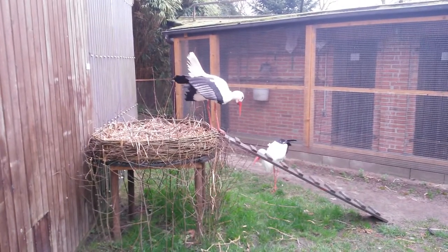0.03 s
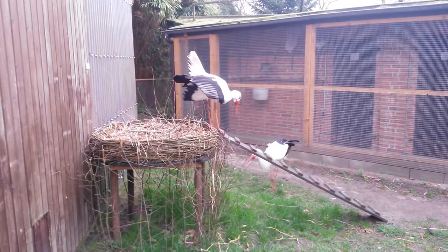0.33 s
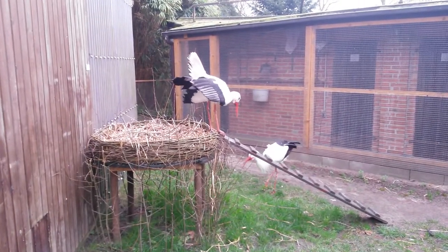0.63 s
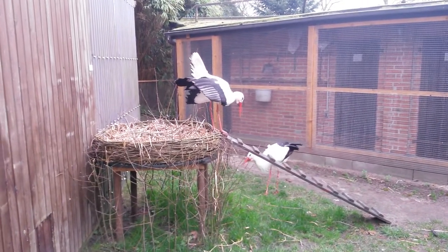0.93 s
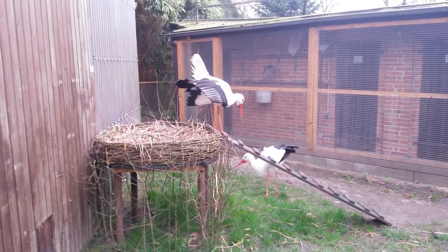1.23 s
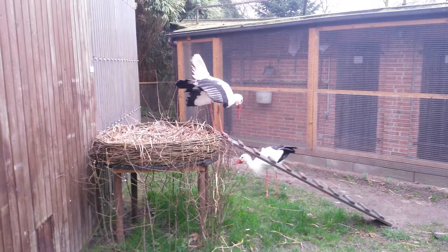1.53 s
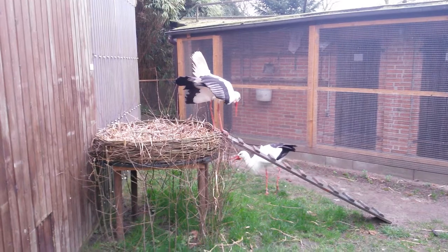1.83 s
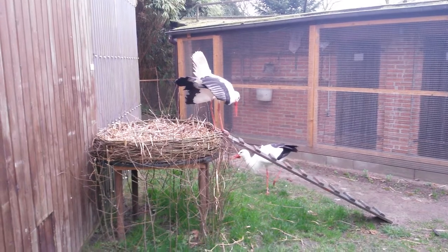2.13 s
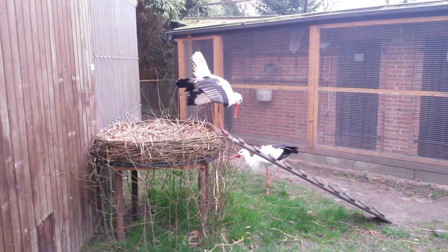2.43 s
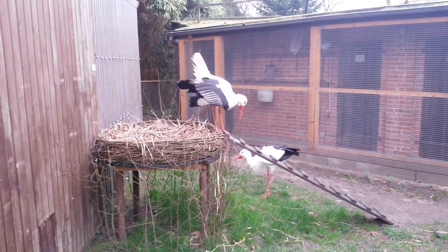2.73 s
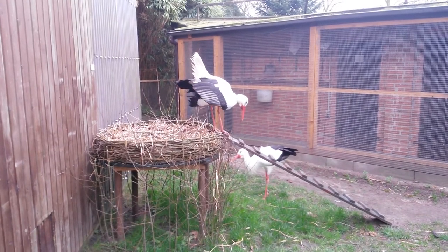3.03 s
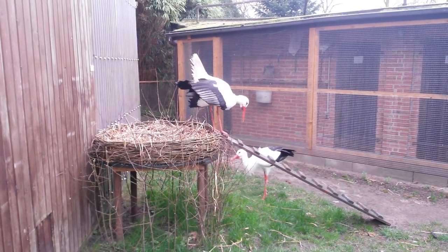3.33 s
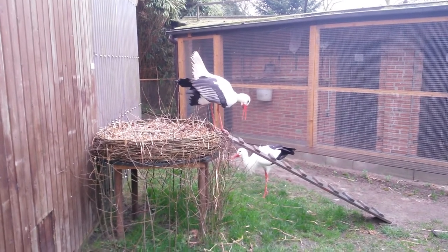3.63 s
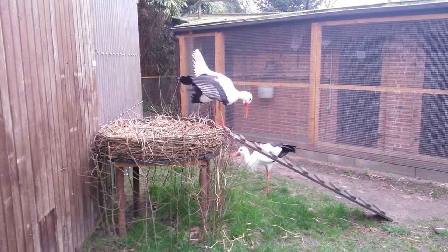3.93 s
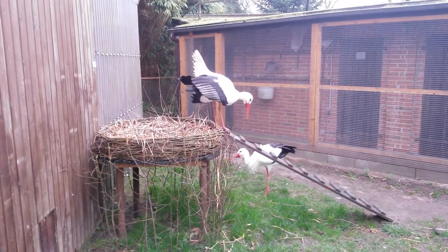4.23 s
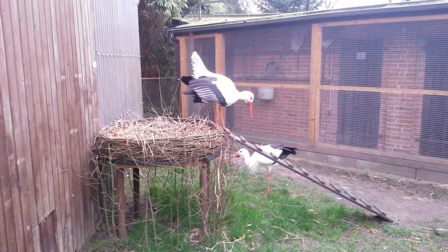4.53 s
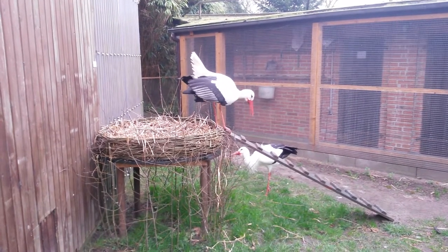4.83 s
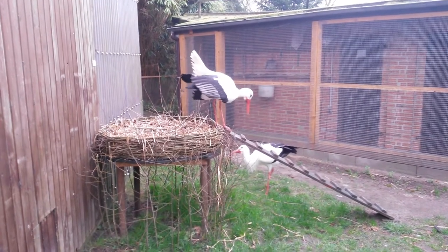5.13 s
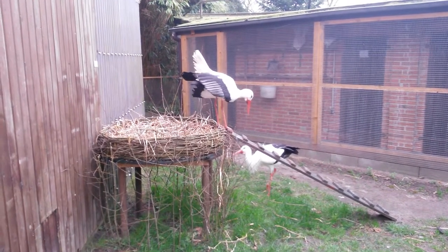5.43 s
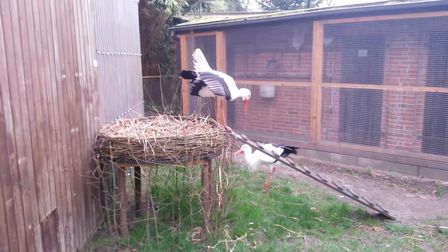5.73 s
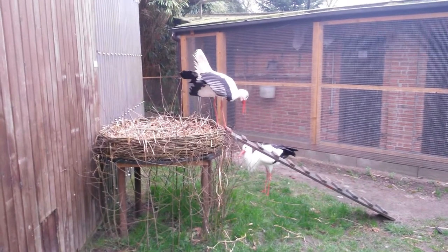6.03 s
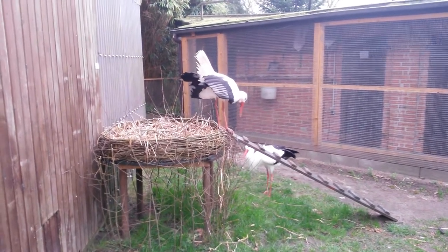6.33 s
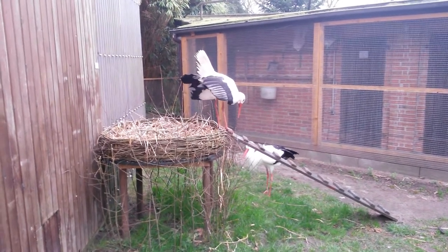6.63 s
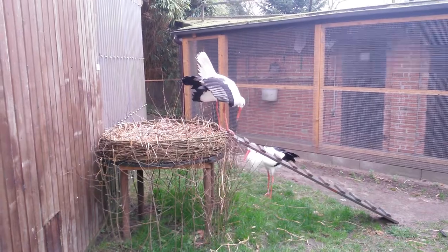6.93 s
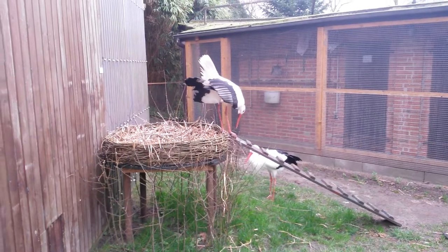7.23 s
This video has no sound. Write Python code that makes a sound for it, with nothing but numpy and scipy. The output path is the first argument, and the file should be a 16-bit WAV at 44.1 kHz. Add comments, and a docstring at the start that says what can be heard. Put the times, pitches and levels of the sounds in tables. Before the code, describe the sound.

From the very start, a stork clatters its bill at about six clacks a second and keeps going for roughly seven seconds. Each clack is a sharp, dry snap with a short hollow ring, thrown back quickly by nearby boards and the walls of an outdoor pen. A second, somewhat softer stork clatters along from the start until about 2.3 seconds, and again from 3.6 to 5.5 seconds. It is slightly faster, so the two drift in and out of step. Near 7 seconds the first stork's clacks turn weaker and duller, dying away by about 7.3. Small birds give faint, thin, high chirps, around 1.3, 3 to 3.5 and 5.4 to 6.2 seconds, and a quiet repeated whistle rises from 6.4 seconds. A low distant rumble, soft hiss and faint hum lie underneath throughout.

```python
"""Storks clattering in a walled pen.

Two white storks clatter their bills, about six clacks a second each, drifting in and out of step.
Each clack is a sharp snap plus the short ring of the hollow bill and throat, thrown back by nearby
boards and the walls behind. Small birds chirp in the trees over a distant rumble and a faint hum."""
import sys
import numpy as np
from scipy import signal
from scipy.fft import rfft, irfft
from scipy.io import wavfile
from scipy.ndimage import uniform_filter1d

SR = 44100
rng = np.random.default_rng(int(sys.argv[2]) if len(sys.argv) > 2 else 0)


def file_out(sig):
    """Save sig as 16-bit WAV at sys.argv[1]."""
    # one column per channel
    cols = np.atleast_2d(sig).T
    # limit, then scale
    lim = np.clip(cols, -1, 1)
    pcm = np.round(lim * 32767).astype(np.int16)
    wavfile.write(sys.argv[1], SR, pcm)


N = 329868
TIME_S = np.arange(N) / SR
CLACK_SAMPLES = 32768
CLACK_HZ = np.arange(CLACK_SAMPLES // 2 + 1) * SR / CLACK_SAMPLES
RADIATION = 1 / (1 + (500 / (CLACK_HZ + 50)) ** 4)  # a small body radiates no bass

# Tempo per bout: (time [s], rate [clacks/s])
PERCH_TEMPO = [(0.06, 5.995), (0.73, 6.082), (1.55, 5.933), (1.73, 6.04), (2.06, 5.764), (2.74, 6.116),
               (3.4, 5.884), (4.25, 5.851), (4.59, 6.042), (5.1, 5.818), (5.61, 5.896), (6.12, 5.894),
               (6.29, 6.086), (6.79, 5.942), (7.11, 6.787)]
GRASS_FIRST_TEMPO = [(0.03, 6.163), (0.67, 6.237), (0.83, 6.405), (1.15, 6.174), (1.47, 6.325), (2.11, 6.2)]
GRASS_SECOND_TEMPO = [(3.56, 6.309), (3.88, 6.347), (4.04, 6.063), (4.36, 6.285), (4.85, 6.179),
                      (5.01, 5.963), (5.34, 6.195)]
# Effort per bout; as the bill goes slack the snap fades first and the ring sinks:
# (time [s], ring gain [dB], snap gain [dB], bill resonance [Hz])
PERCH_EFFORT = [(0.06, -8.5, 1.5, 2040), (1.72, -10, 2, 1990), (2.23, -7.5, 2.5, 2090),
                (2.5, -6, 0.5, 2120), (3.1, -4.5, 5, 2033), (3.75, -6, 1, 1980), (4.75, -5, 1.5, 1936),
                (5.25, -4, 4.5, 2050), (6.12, -6.5, 3, 2030), (6.79, -6, -0.8, 1985),
                (6.95, -11, -9.5, 1850), (7.11, -13, -13, 1760), (7.261, -24.5, -19.5, 1640)]
GRASS_FIRST_EFFORT = [(0.03, -11, -20, 2050), (0.5, -6, -12, 2000), (1.15, -7, -10.5, 2085),
                      (1.55, -4.2, -1, 2090), (2.27, -7.5, -8.5, 2055)]
GRASS_SECOND_EFFORT = [(3.56, -8, -19, 2020), (3.9, -4, -3, 2080), (4.6, -3.5, -0.5, 2047),
                       (5.2, -2, 0.5, 2105), (5.5, -4.5, -4.5, 2130)]


def bout(tempo, effort, start_s, count, ring_spread_db=0.23, snap_spread_db=0.96):
    """A run of clacks, no two alike: one row each, columns as in the effort tables."""
    times = [start_s]
    for _ in range(count - 1):
        times.append(times[-1] + 1 / curve(tempo, times[-1]))
    effort_s, *controls = np.transpose(effort)
    ring_db, snap_db, bill_hz = (np.interp(times, effort_s, control) for control in controls)
    jitter = rng.standard_normal((count, 2)).T
    ring_db += ring_spread_db * jitter[0]
    snap_db += snap_spread_db * jitter[1]
    return np.transpose([times, ring_db, snap_db, bill_hz])


# Head motion: (time [s], echo path shift [ms])
HEAD_MOTION = [(0, 0.064), (1.6, -0.015), (2.4, -0.14), (3.2, 0.1), (4.4, 0.21), (5.2, 0.28), (6.1, 0),
               (6.7, -0.19), (7.4, -0.17)]
# Scattered echoes: (onset [ms], build-up [ms], t60 [s], gain [dB], treble [dB])
BOARD_SCATTER = (.4, 1, .085, -2.5, -1)
WALL_SCATTER = (13, 7, .095, 2, -3)
YARD_SCATTER = (25, 18, 0.23, -9, -2.5)
# Echo strength per position: (nest and boards [dB], walls and yard [dB], wall slap [dB])
PERCH_PLACE = (0, -0.3, 1.8)
GRASS_PLACE = (-3, -5.5, -3)


def stork(clacks, place, throat_db, treble_db, sway=2.5):
    """Mandibles slap shut; snap and ring arrive directly and by echoes that shift with the head."""
    out = np.zeros((2, N))
    near_gain, far_gain, slap_gain = undb(place)
    snap = bill_snap(treble_db)
    boards = scatter(*BOARD_SCATTER, count=200)
    walls = scatter(*WALL_SCATTER, count=500)
    yard = scatter(*YARD_SCATTER, count=4000)
    mic_delay = np.exp(-2j * np.pi * np.outer([0, 2], CLACK_HZ) / SR)  # left is 2 samples nearer
    fade = np.minimum(np.linspace(4, 0, CLACK_SAMPLES), 1)
    for time_s, ring_db, snap_db, bill_hz in clacks:
        throat_jitter, pitch_jitter, head_jitter, *path_jitter = rng.standard_normal(5)
        ring = undb(ring_db) * hollow_ring(bill_hz, throat_db + 0.83 * throat_jitter,
                                           detune=0.0093 * pitch_jitter)
        clack = ring + undb(snap_db) * snap
        head_ms = curve(HEAD_MOTION, time_s) + 0.03 * head_jitter
        shift_ms = sway * head_ms + 0.15 * path_jitter[0]
        near = near_gain * (nest_echoes(head_ms) + boards(shift_ms))
        far = far_gain * (walls(shift_ms) + yard(shift_ms))
        # The ring spreads all round, so the walls return more of it than of the snap.
        slap = slap_gain * ring * wall_slap(shift_ms, path_jitter)
        spectrum = clack * (1 + near + far) + slap
        add(out, time_s, fade * irfft(spectrum * mic_delay))
    return out


# Snap spectrum: (frequency [Hz], relative level [dB])
SNAP_SPECTRUM = [(300, -52.5), (1000, -7), (1400, -25), (1720, -6), (2650, -4), (3650, -0.5), (4800, 3.5),
                 (6300, 3), (7300, -2.5), (8600, -8.5), (10500, -16), (14000, -27), (15000, -79),
                 (16500, -84)]


def bill_snap(treble_db):
    """Spectrum of the bill's horny edges striking."""
    treble = colour([(6500, 0), (10000, treble_db)], CLACK_HZ)
    return minimum_phase(colour(SNAP_SPECTRUM, CLACK_HZ) * treble * RADIATION)


# Hollow bill and throat pouch modes: (frequency [Hz], width [Hz], relative level [dB])
BILL_MODES = [(1980, 305, 2), (3192, 434, -4), (4550, 1200, -14.5)]
THROAT_MODES = [(702, 280, -2.5), (750, 28, -6), (950, 230, -14.5)]


def hollow_ring(bill_hz, throat_db, detune, taut_hz=2056, slack_db_per_hz=0.01):
    """Cavity spectrum; a slack bill's first mode, bill_hz, lies lower and the throat stands out."""
    slack_db = slack_db_per_hz * (taut_hz - bill_hz)
    throat = undb(throat_db + slack_db) * resonances(THROAT_MODES, CLACK_HZ * (1 + detune))
    first_mode = (bill_hz, *BILL_MODES[0][1:])
    bill = resonances([first_mode, *BILL_MODES[1:]], CLACK_HZ)
    return minimum_phase((bill + throat) * RADIATION)


# Nest and board reflections: (delay [ms], left [dB], right [dB], share of head motion [ratio])
NEST_ECHOES = [(1.27, -2, -5, .25), (2.5, -10, -9, .6), (3.6, -4, -8, 1), (4.05, -12, -6, .9)]


def nest_echoes(head_ms):
    """Stereo spectrum of the first reflections off the nest and boards."""
    return sum(echo(ms + share * head_ms, left, right) for ms, left, right, share in NEST_ECHOES)


# House wall reflections: (delay [ms], left [dB], right [dB])
WALL_ECHOES = [(18.3, -7, -3), (25.5, -5, -4)]


def wall_slap(shift_ms, path_jitter, spread_ms=0.32):
    """Stereo spectrum of the distinct echoes off two house walls."""
    return sum(echo(ms + shift_ms + spread_ms * jitter, left, right)
               for (ms, left, right), jitter in zip(WALL_ECHOES, path_jitter))


def scatter(onset_ms, rise_ms, t60_s, gain_db, treble_db, count, mic_offset_ms=0.16):
    """A swarm of reflections; returns their stereo spectrum as a function of path shift."""
    lag_s = t60_s * (np.arange(count) + rng.random(count)) / count
    build_up = 1 - np.exp(-lag_s * 1000 / rise_ms)
    gains = rng.standard_normal(count) * build_up * np.exp(-np.log(1000) * lag_s / t60_s)
    gains *= undb(gain_db) / np.linalg.norm(gains)
    follow, bearing = rng.uniform(-1, 1, (2, count))
    damping = colour([(2200, 0.038), (3600, treble_db)], CLACK_HZ)

    def spectrum(shift_ms):
        delay_ms = onset_ms + follow * shift_ms + np.outer([-1, 1], bearing) * mic_offset_ms
        taps = np.clip((lag_s + delay_ms / 1000) * SR, 0, CLACK_SAMPLES - 1).astype(int)
        return damping * rfft([np.bincount(side, gains, CLACK_SAMPLES) for side in taps])
    return spectrum


# Nearest birds: (time [s], length [s], pitch [Hz], level [dB])
NEAR_CHIRPS = [(1.31, 0.052, 6600, -44), (2.96, 0.046, 6900, -47), (3.14, 0.045, 6150, -45),
               (3.17, 0.076, 5520, -46), (3.33, 0.035, 4600, -56), (3.48, 0.11, 6950, -45.5),
               (5.35, 0.06, 4320, -51), (5.4, 0.095, 6850, -41), (5.81, 0.06, 6800, -46),
               (5.88, 0.032, 4730, -48.5), (6.24, 0.031, 6650, -48), (7.39, 0.085, 4480, -45)]


def songbirds(glide, waver, echo_db, chirps=NEAR_CHIRPS, overtone_db=-15, echo_t60_s=0.65):
    """Thin, raspy chirps blurred by trees and walls; glide and waver are fractions of the pitch."""
    direct = np.zeros((2, N))
    tremble = 1 + waver * drift(700)
    rasp = undb(4.3 * drift(250))
    for time_s, length_s, start_hz, level_db in chirps:
        n = int(length_s * SR)
        span = (int(time_s * SR) + np.arange(n)) % N
        pitch_hz = start_hz * np.linspace(1, 1 + glide, n) * tremble[span]
        phase = 2 * np.pi * np.cumsum(pitch_hz) / SR
        note = np.sin(phase) + undb(overtone_db) * np.sin(2 * phase) * (start_hz < SR / 9)
        note *= np.sqrt(np.hanning(n)) * rasp[span]
        add(direct, time_s, undb(level_db) * np.array([note, note]))
    tail_s = np.arange(SR // 2) / SR
    tail = rng.standard_normal((2, len(tail_s))) * np.exp(-np.log(1000) * tail_s / echo_t60_s)
    tail *= undb(echo_db) / np.linalg.norm(tail[0])
    return direct + signal.fftconvolve(direct, tail, axes=1)[:, :N]


# Phrases: (start [s], end [s], start pitch [Hz], end pitch [Hz], start level [dB], end level [dB])
WHISTLE_PHRASES = [(2.531, 2.91, 4870, 4440, -73, -73), (6.411, 7.423, 5000, 5230, -63, -49)]


def whistler(period_s=0.155, note_s=0.085):
    """One bird repeats a thin whistle, pitch and level interpolated over each phrase."""
    notes = []
    for start_s, end_s, start_hz, end_hz, start_db, end_db in WHISTLE_PHRASES:
        for time_s in np.arange(start_s, end_s, period_s):
            pitch_hz = np.interp(time_s, [start_s, end_s], [start_hz, end_hz])
            level_db = np.interp(time_s, [start_s, end_s], [start_db, end_db])
            notes.append((time_s, note_s, pitch_hz, level_db))
    return songbirds(glide=-0.02, waver=0.011, echo_db=-1, chirps=notes)


# Flock activity: (time [s], chirp level [dB])
FLOCK_LEVEL = [(0, -48.5), (1.9, -56), (2.4, -60.5), (3.1, -53), (4.6, -58), (5.5, -44), (6.1, -57),
               (6.6, -79), (7.4, -46)]


def flock(count=60):
    """Many farther birds chirp at random times and pitches."""
    offset, length, pitch, loudness = rng.random((count, 4)).T
    time_s = (np.arange(count) + offset) / count * (N / SR - 0.15)
    level_db = curve(FLOCK_LEVEL, time_s) + 6 * (loudness - 0.5)
    chirps = np.transpose([time_s, 0.0437 + 0.037 * length, 4000 + 3400 * pitch, level_db])
    return songbirds(glide=-0.0638, waver=0.041, echo_db=5.0, chirps=chirps)


# Rumble and air spectrum: (frequency [Hz], relative density [dB])
AIR_SPECTRUM = [(20, -26), (33, -24), (60, 0.5), (120, -5), (200, -6.5), (260, -9.5), (320, -6.5),
                (420, -8), (750, -13.5), (1100, -6), (1700, -12), (6000, -14), (9500, -28), (14000, -36),
                (16000, -54)]
# Swell of rumble and hum: (time [s], base level [dB])
SWELL = [(0.0, -58), (2.43, -59), (2.99, -54.5), (5.19, -52), (5.85, -56.5), (7.45, -51)]


def air(rumble_gain_db=6.5, hiss_gain_db=-56, flicker_db=1.15, bass_width=0.23, crossover_hz=1100):
    """Distant, near-central rumble swells slowly under a steady, wide hiss."""
    hz = np.arange(N // 2 + 1) * SR / N
    mid, side = rfft(rng.standard_normal((2, N)))
    width = np.interp(hz, [100, 1000], [bass_width, 1])
    spectrum = colour(AIR_SPECTRUM, hz) * (mid + np.outer([1, -1], width * side))
    spectrum /= irfft(spectrum, N).std()
    lowpass = 1 / (1 + (hz / crossover_hz) ** 4)
    swell_db = curve(SWELL, TIME_S) + flicker_db * drift(4.7)
    rumble = irfft(spectrum * lowpass, N) * undb(swell_db + rumble_gain_db)
    hiss = irfft(spectrum * (1 - lowpass), N) * undb(hiss_gain_db)
    return rumble + hiss


def hum(pitch_hz=320, gain_db=-12.5, flicker_db=3.7):
    """A faint, far-off tone wavers and swells with the rumble."""
    phase = 2 * np.pi * np.cumsum(pitch_hz * (1 + 0.0181 * drift(18))) / SR
    return np.sin(phase) * undb(curve(SWELL, TIME_S) + gain_db + flicker_db * drift(14))


def undb(db):
    """Decibels to gain."""
    return 10 ** (np.asarray(db) / 20)


def curve(points, time_s):
    """Linear interpolation of (time [s], value) points."""
    return np.interp(time_s, *np.transpose(points))


def colour(points, hz):
    """Gain at hz from (frequency [Hz], level [dB]) points on a log axis."""
    point_hz, db = np.transpose(points)
    return undb(np.interp(np.log(hz + 1), np.log(point_hz), db))


def minimum_phase(gain):
    """Spectrum of the most compact unit-energy hit with this gain shape."""
    cepstrum = irfft(np.log(gain / np.sqrt(np.mean(gain ** 2))))
    half = len(cepstrum) // 2
    cepstrum[1:half] *= 2
    cepstrum[half + 1:] = 0
    return np.exp(rfft(cepstrum))


def resonances(modes, hz):
    """Summed gain of steep-skirted modes."""
    return sum(undb(db) / (1 + ((hz ** 2 - mode_hz ** 2) / ((hz + 1) * width_hz)) ** 2)
               for mode_hz, width_hz, db in modes)


def echo(delay_ms, left_db, right_db):
    """Stereo spectrum of one reflection."""
    return undb([[left_db], [right_db]]) * np.exp(-2j * np.pi * CLACK_HZ * delay_ms / 1000)


def drift(rate_hz):
    """Random steps at rate_hz, smoothed twice; unit spread."""
    hold = int(SR / rate_hz)
    steps = np.repeat(rng.standard_normal(N // hold + 1), hold)
    smooth = uniform_filter1d(uniform_filter1d(steps, hold), hold)[:N]
    return smooth / smooth.std()


def add(out, time_s, sound):
    """Mix a stereo sound in at time_s."""
    start = max(int(time_s * SR), 0)
    part = sound[:, :max(N - start, 0)]
    out[:, start:start + part.shape[1]] += part


def scene():
    """One long bout from the perch, two short ones from the grass; small birds, air and hum."""
    long_bout = bout(PERCH_TEMPO, PERCH_EFFORT, start_s=0.0624, count=44)
    perch = stork(long_bout, PERCH_PLACE, throat_db=1.0, treble_db=0.06)
    first_bout = bout(GRASS_FIRST_TEMPO, GRASS_FIRST_EFFORT, start_s=0.0283, count=15)
    second_bout = bout(GRASS_SECOND_TEMPO, GRASS_SECOND_EFFORT, start_s=3.5636, count=13)
    grass = stork(np.vstack([first_bout, second_bout]), GRASS_PLACE, throat_db=-0.4, treble_db=-0.5)
    near_birds = songbirds(glide=-0.0306, waver=0.033, echo_db=5.5)
    return perch + grass + near_birds + whistler() + flock() + air() + hum()


# Microphone response: (frequency [Hz], left [dB], right [dB])
MIC_RESPONSE = [(725, 1.5, 1.5), (1300, 0.5, 1.5), (1840, 1.5, 6), (3360, 6, 5.5), (4100, 3.5, 0.5),
                (7070, 5.5, -6), (7800, 4, 4.5), (11300, 5.5, 4.5), (11700, -5, 5)]


def record(dry, taps=1024, ceiling=0.91, cutoff_hz=16400):
    """Each microphone colours the treble; peaks are rounded and the top is cut steeply."""
    hz = np.arange(taps // 2 + 1) * SR / taps
    heard = []
    for channel, sound in enumerate(dry):
        gain = colour(np.array(MIC_RESPONSE)[:, [0, channel + 1]], hz)
        impulse = irfft(minimum_phase(gain)) * np.sqrt(np.mean(gain ** 2))
        heard.append(signal.fftconvolve(sound, impulse)[:N])
    rounded = ceiling * np.tanh(np.array(heard) / ceiling)
    lowpass = signal.ellip(8, 0.2, 70, cutoff_hz, fs=SR, output="sos")
    return signal.sosfilt(lowpass, rounded)


dry = scene()
out = record(dry)
file_out(out)
```